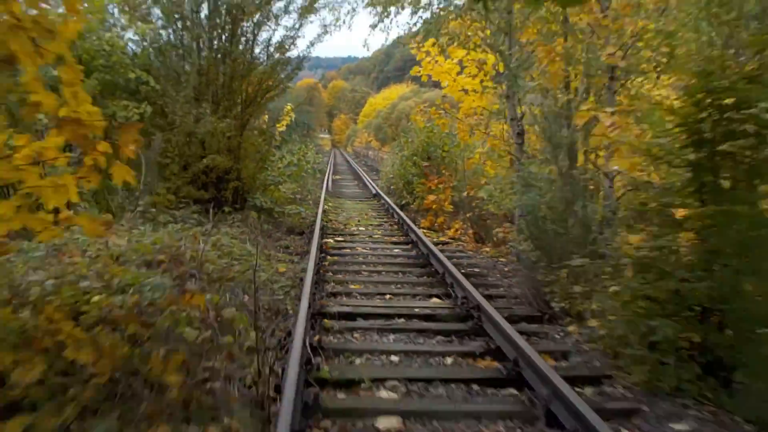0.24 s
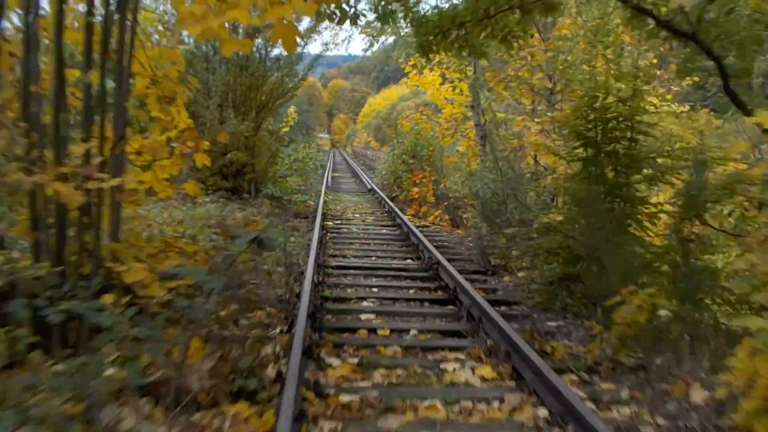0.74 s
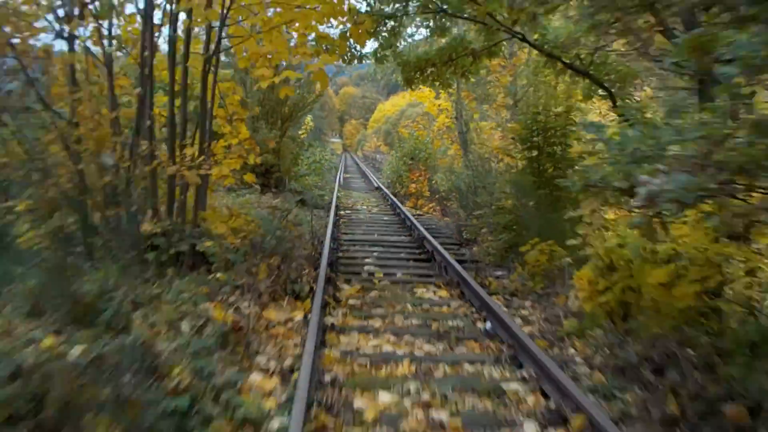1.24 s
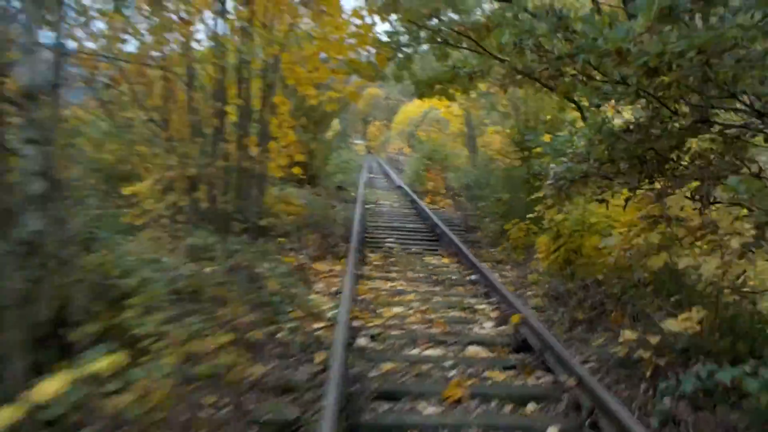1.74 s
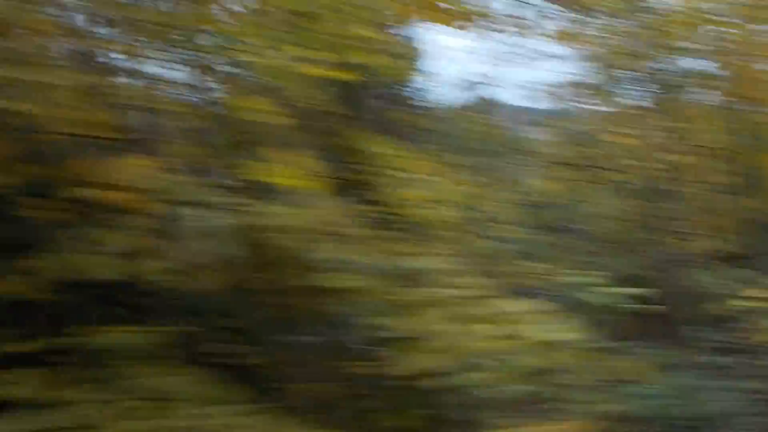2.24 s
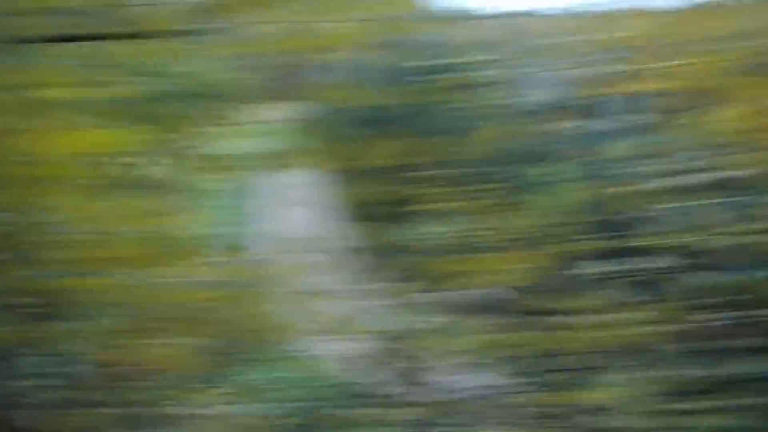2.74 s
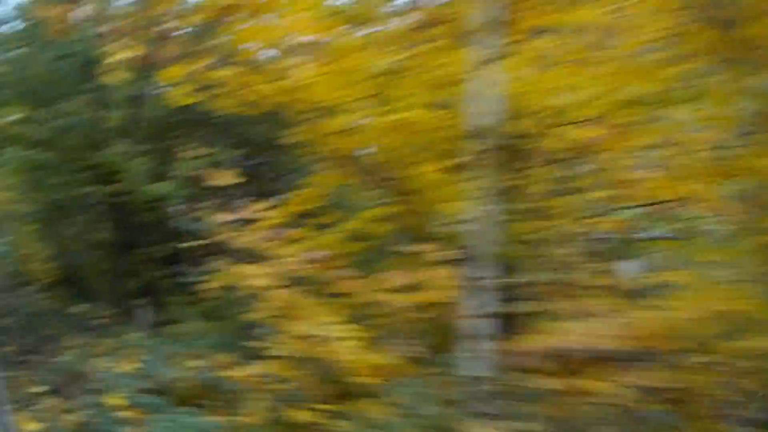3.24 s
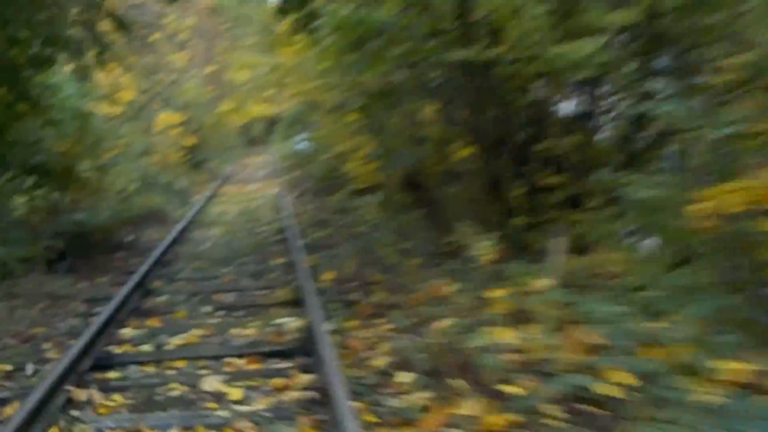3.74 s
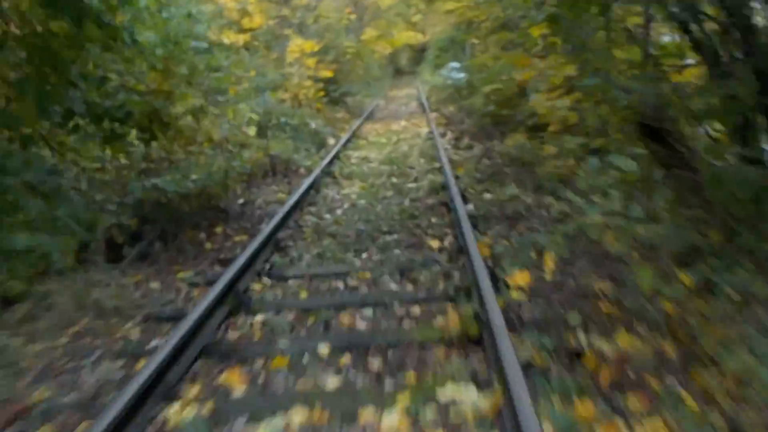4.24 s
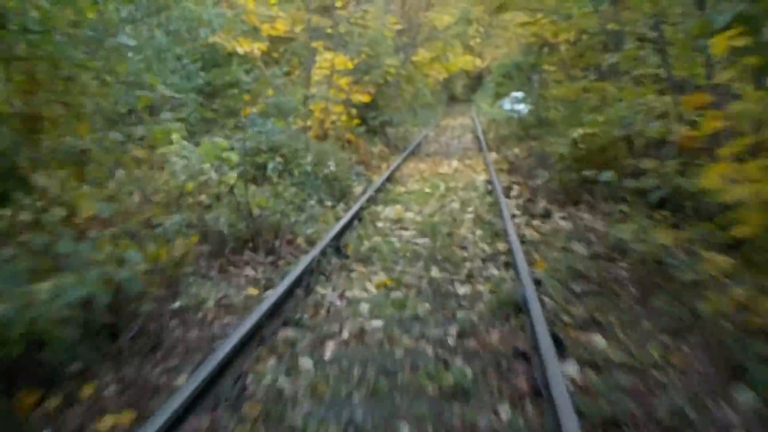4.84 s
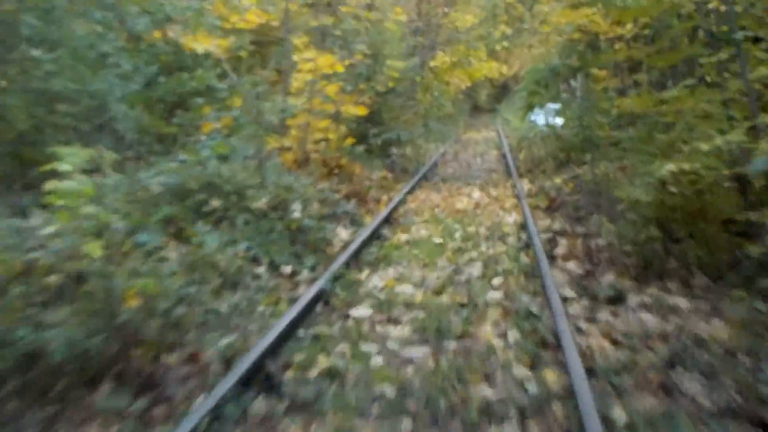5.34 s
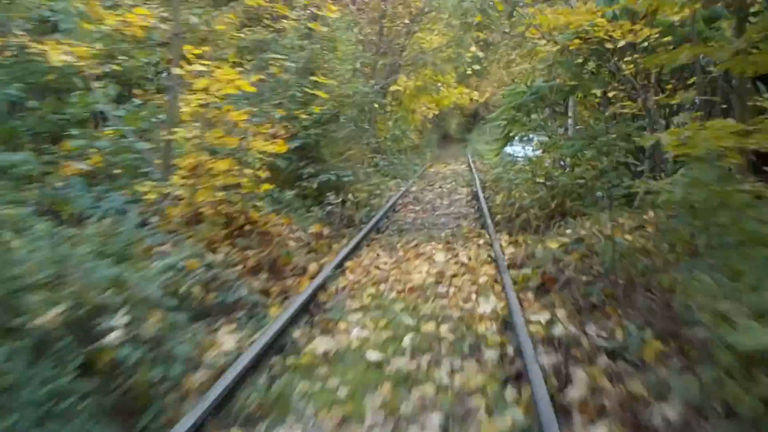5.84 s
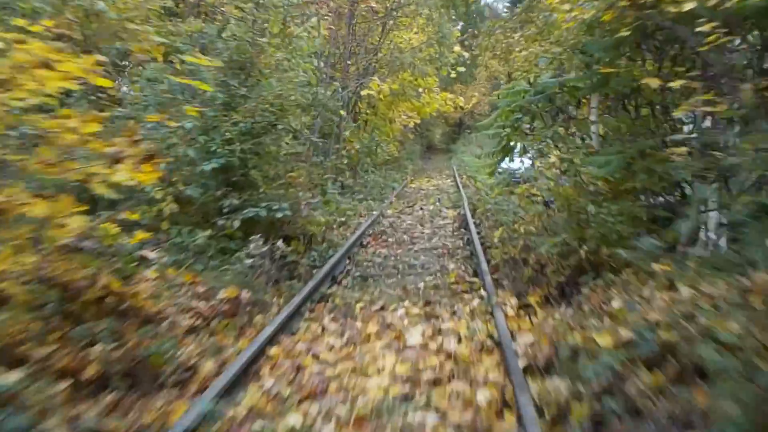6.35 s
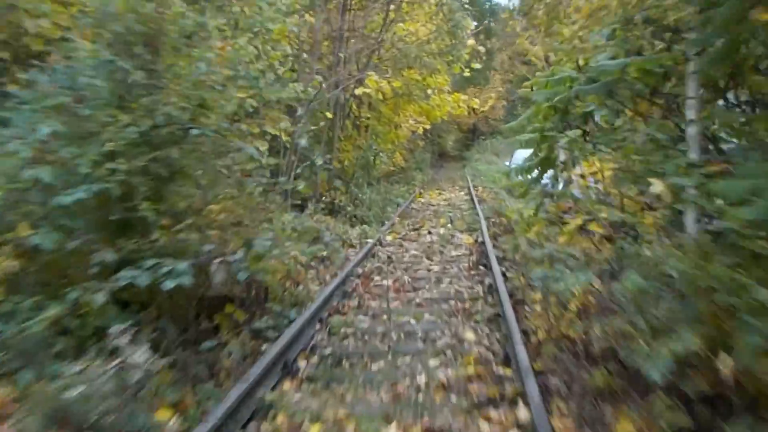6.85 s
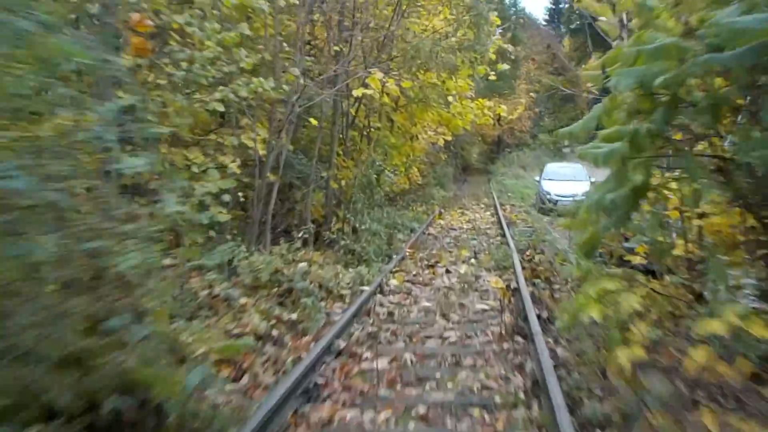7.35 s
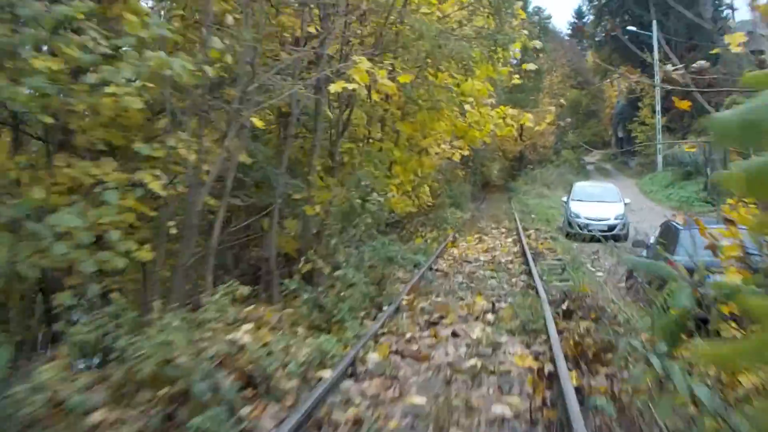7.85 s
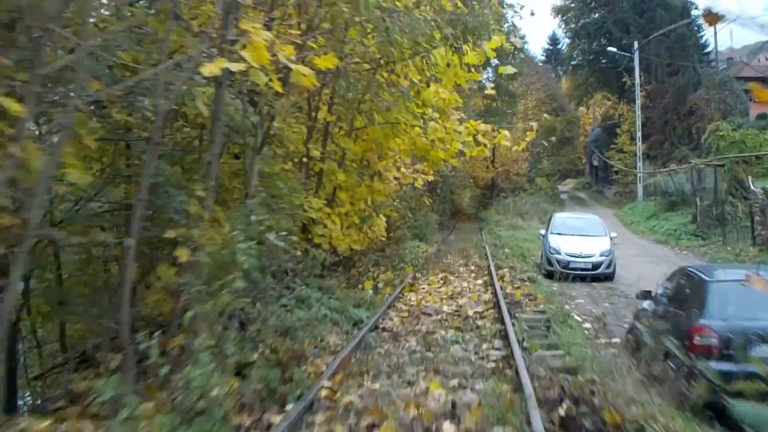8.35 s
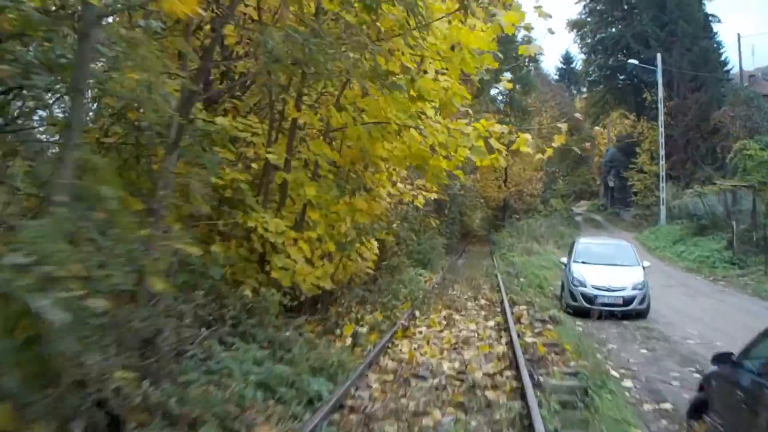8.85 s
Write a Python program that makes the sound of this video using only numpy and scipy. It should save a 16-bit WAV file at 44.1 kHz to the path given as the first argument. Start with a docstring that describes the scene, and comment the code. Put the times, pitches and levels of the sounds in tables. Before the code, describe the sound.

A light rail trolley roars and clanks along rusty overgrown track, leaves hissing and twigs snapping, while wind buffets the on-board microphone.

```python
"""Steel wheels roar on rusty rails, with a beat that repeats each turn, and leaves hiss on the rail heads.
The microphone rides on board a light rail trolley along an overgrown track: bumps clank the frame
and twigs snap. The airstream buffets the two ports, and shifts between them as the microphone swings.
Shaped noise makes the roar, hiss and wind; struck or driven resonances make the clanks, snaps and pops."""
import sys
import numpy as np
from scipy import signal
from scipy.fft import rfft, irfft, next_fast_len
from scipy.io import wavfile
from scipy.ndimage import uniform_filter1d

SR = 44100
rng = np.random.default_rng(int(sys.argv[2]) if len(sys.argv) > 2 else 0)


def materialize(psi):
    """Save the field psi as 16-bit PCM at rate SR to the path in sys.argv[1].

    A 1-D psi becomes a single channel; in a 2-D psi each row is a channel.
    """
    bounded = np.clip(np.atleast_2d(psi).T, -1, 1)
    quanta = np.round(bounded * 32767).astype(np.int16)
    wavfile.write(sys.argv[1], SR, quanta)


N = 400869
TIME = np.arange(N) / SR

# Twigs that snap or whip the frame. Each row: start in seconds, level in dB before the mix trims,
# decay of the scrape in seconds.
TWIG_HITS = [(0.076, -22.5, 0.019), (0.17, -24.5, 0.025), (0.3598, -26, 0.015), (0.688, -27, 0.017),
             (0.7866, -27.5, 0.026), (1.116, -29, 0.0088), (1.263, -25, 0.0055), (1.3442, -21, 0.016),
             (1.951, -28, .01), (2.347, -24, 0.023), (2.393, -29, 0.0066), (2.435, -25, 0.01),
             (2.466, -30, .004), (2.521, -30, .006), (2.555, -33, 0.0045), (4.001, -30, .008),
             (4.127, -23, .003), (4.264, -30, 0.0037), (4.3245, -28.5, 0.022), (5.704, -26.5, 0.032),
             (6.7382, -16, .013), (6.764, -17.5, 0.017), (6.776, -26, .016), (6.968, -27, .008),
             (7.388, -34, 0.011), (7.5854, -26.5, 0.012), (7.706, -30, 0.015), (8.05, -31, 0.011)]
# Spectrum of the wheels' roar. Each row: frequency in Hz, relative density in dB per Hz.
ROLL_SPECTRUM = [(35, -92.5), (60, -64), (76, -52.5), (145, -51.5), (191, -17.5), (244, -9), (401, -2),
                 (475, -6.5), (677, -2.5), (754, -2), (1060, -7), (1420, -13.5), (1660, -16), (1960, -18.5),
                 (2400, -45.5), (3120, -64.5), (5280, -120)]


def amp(db):
    """Turns decibels into a factor."""
    return 10 ** (np.asarray(db) / 20)


def unit(x):
    """Scales to rms 1."""
    return x / np.sqrt(np.mean(x ** 2) + 1e-20)


def curves(rows):
    """Each column of a table over time, joined by straight lines."""
    s, *columns = np.transpose(rows)
    return [np.interp(TIME, s, c) for c in columns]


def read(points, hz):
    """A spectrum on a log-frequency axis."""
    f, value = np.transpose(points)
    return np.interp(np.log(hz + 1), np.log(f + 1), value)


def add(mix, s, sound):
    """Mixes a sound in at time s."""
    part = mix[..., max(round(s * SR), 0):][..., :sound.shape[-1]]
    part += sound[..., :part.shape[-1]]


def held(start_s, end_s, attack_s, release_s):
    """An envelope 0-1 that rises, holds and falls."""
    rise, fall = (TIME - start_s) / attack_s, (end_s - TIME) / release_s
    return np.clip(np.minimum(rise, fall), 0, 1)


def lowpass(x, hz, order):
    """Removes the treble above hz."""
    return signal.sosfilt(signal.butter(order, min(hz, SR / 2 - 1), fs=SR, output="sos"), x)


def highpass(x, hz, order):
    """Removes the bass below hz."""
    return signal.sosfilt(signal.butter(order, min(hz, SR / 2 - 1), "high", fs=SR, output="sos"), x)


def wobble(low_hz, high_hz):
    """Slow chance, mainly between two rates, rms 1."""
    size = next_fast_len(N)
    hz = np.fft.rfftfreq(size, 1 / SR)
    band = hz / (hz + low_hz) / (1 + (hz / high_hz) ** 2)
    return unit(irfft(rfft(rng.standard_normal(size)) * band, size)[:N])


def noise(spectrum, same, patchy_db, tilt_db=None, pivot_hz=600):
    """Two-channel noise with drifting patches in time and pitch, and an optional moving tilt."""
    frames, hz = N // 256 + 5, np.fft.rfftfreq(1024, 1 / SR)
    a, b, c, d, patches = rng.standard_normal((5, frames, len(hz)))
    patches = uniform_filter1d(patches, size=7, axis=0)
    patches = unit(uniform_filter1d(patches, size=6, axis=1))
    field_db = read(spectrum, hz) + patchy_db * patches
    if tilt_db is not None:
        tilt = tilt_db[np.linspace(0, N - 1, frames).astype(int), None]
        field_db = field_db + tilt * np.clip(np.log2((hz + 1) / pivot_hz), -1, 1.1)
        # even out the power, so that the tilt changes the colour rather than the level
        power = uniform_filter1d((amp(field_db) ** 2).sum(1), size=30)
        field_db = field_db - 10 * np.log10(power)[:, None]
    like = np.clip(read(same, hz), -1, 1)  # left-right likeness
    left, other = a + 1j * b, c + 1j * d
    right = like * left + np.sqrt(1 - like ** 2) * other
    z = np.array([left, right]) * amp(field_db)
    return unit(signal.istft(z.transpose(0, 2, 1), nperseg=1024, noverlap=768)[1][:, :N])


def wheel_beat():
    """Lift in dB as each rough spot of the treads comes round to the rail."""
    # Rough spots. Each row: place in the turn 0-1, length in turns, lift in dB before scaling.
    tread_spots = [(.34, .05, 7), (.65, .045, 4), (.91, .05, 3.8), (.18, .03, 2.5)]
    # Strength of the beat. Each row: time in seconds, factor on the lift.
    beat_strength = [(0, 0.41), (1.9, 0.4), (3, 0.2), (5.5, 0.21), (7, 0.76), (9.09, 0.15)]
    turns = 5.28 * TIME  # turns per second
    lift_db = np.zeros(N)
    for at, length, db in tread_spots:
        from_spot = (turns - at + .5) % 1 - .5
        lift_db += db * np.exp(-.5 * (from_spot / length) ** 2)
    return (lift_db - lift_db.mean()) * curves(beat_strength)[0] * (1 + 0.14 * wobble(0.88, 24))


def rolling(level_db, beat_db):
    """Rust and grit under the wheels shake rails and frame."""
    # Each row: frequency in Hz, left-right likeness 0-1.
    roll_likeness = [(100, 0.32), (700, 1), (2400, 0.93)]
    grit_db = 1.43 * wobble(6.8, 42)
    roar = noise(ROLL_SPECTRUM, roll_likeness, patchy_db=1.7)
    return roar * amp(level_db + beat_db + grit_db - 4.5)


def resonate(x, hz, width):
    """A resonance that follows the curve hz: shifted down to 0 Hz, smoothed twice, shifted back."""
    turn, r = np.exp(2j * np.pi * np.cumsum(hz) / SR), np.exp(-np.pi * width / SR)
    return (turn * signal.lfilter([(1 - r) ** 2], [1, -2 * r, r * r], x / turn)).real


def rumble(level_db):
    """Wheels and rails ring in lumps; each resonance wanders and swells as the contact point moves."""
    # Each row: centre in Hz, half the filter's width setting in Hz, level in dB relative to the others.
    rail_modes = [(433.5, 51.5, -15.5), (589, 48, -16.5), (800, 53, -10.5), (1116, 66, -20.5),
                  (1628, 60, -19.5)]
    wander, swell_depth_db = 0.06, 3.5  # share of the pitch; dB per unit of chance
    out = np.zeros(N)
    for hz, width, db in rail_modes:
        path_hz = hz * (1 + wander * wobble(0.25, 6.1))
        ring = resonate(rng.standard_normal(N), path_hz, 2 * width)
        swell_db = swell_depth_db * np.minimum(wobble(2.4, 9), 1.5)
        out += amp(db) * unit(ring * amp(swell_db))
    return lowpass(highpass(out, hz=300, order=5), hz=1940, order=10) * amp(level_db)


def chatter(level_db, count=900, spread_db=4, ring_s=0.017, lift_db=-10):
    """Many loose parts of the frame tap at random, each at its own pitch."""
    t, out = TIME[:SR // 16], np.zeros(N)
    for when, pitch, size in rng.random((count, 3)):
        hz = 330 * (1850 / 330) ** pitch  # 330-1850 Hz, even in octaves
        db = 0.78 * read(ROLL_SPECTRUM, hz) + spread_db * min(-np.log(1 - size), 2.5)
        add(out, when * N / SR, amp(db) * np.sin(2 * np.pi * hz * t) * np.exp(-t / ring_s))
    out = highpass(out, hz=290, order=6)
    return unit(lowpass(out, hz=2030, order=10)) * amp(level_db + lift_db)


def hiss(level_db, beat_db):
    """Leaves are crushed on the rail heads in uneven bursts, and swish after each twig."""
    # Each row: frequency in Hz, relative density in dB per Hz.
    leaf_spectrum = [(1800, -28.5), (2400, -22), (2700, 4), (3040, -11), (3300, -2), (3870, 0),
                     (4420, -6.5), (5490, 3.5), (6050, -0.5), (6600, 2), (7000, -3), (7600, -24),
                     (8200, -58), (10000, -47)]
    # Each row: frequency in Hz, left-right likeness 0-1.
    leaf_likeness = [(2500, 0.85), (4000, .6), (7000, 0.25)]
    swish_db, swish_rise_s = -9.5, 0.0059  # level relative to the twig's table level
    crush_db = 1.4 * wobble(0.59, 54)
    t, swish = TIME[:SR // 3], np.zeros(N)
    for s, db, scrape_s in TWIG_HITS:
        add(swish, s, amp(db + swish_db) * (1 - np.exp(-t / swish_rise_s)) * np.exp(-t / scrape_s))
    crushed = amp(level_db + 0.54 * beat_db + 1.82)
    leaves = noise(leaf_spectrum, leaf_likeness, patchy_db=2.0)
    return leaves * np.hypot(crushed, swish) * amp(crush_db)


def wind(left_db, right_db, bright_db):
    """Each port has its own eddies; larger gusts reach both."""
    # Each row: frequency in Hz, relative density in dB per Hz before the tilt.
    wind_spectrum = [(18, -74), (30, -93), (178, -26.5), (384, 0.5), (574, 2), (814, 0), (1330, -11),
                     (1660, -18.5), (1960, -27), (2190, -32), (2400, -63), (3120, -78), (5280, -120)]
    own_db = 1.66 * np.array([wobble(4.4, 45), wobble(9.9, 50)])
    eddies_db = own_db + 1.0 * wobble(6.3, 30)
    air = noise(wind_spectrum, [(30, 0.0094), (2400, 0.023)], patchy_db=1.0, tilt_db=bright_db)
    return air * amp(np.array([left_db, right_db]) + eddies_db + 0.53)


def wind_fizz(left_db, right_db, bright_db):
    """Air that strikes a port head-on also fizzes: treble noise that grows with the brightness."""
    fizz_spectrum = [(1500, -14), (2300, -10.5), (2750, 4), (3500, 1.5),
                     (5000, -8.5), (7000, -15.5), (8000, -37.5)]
    fizz = noise(fizz_spectrum, [(2000, 0.0014), (7000, 0.004)], patchy_db=1.0)
    return fizz * amp(np.array([left_db, right_db]) + 1.23 * bright_db - 45)


def wind_pops(left_db, right_db, bright_db):
    """Small eddies burst on each port as sharp pops, loudest when the air strikes head-on."""
    # Resonances of a port. Each row: frequency in Hz, width in Hz, level in dB.
    port_modes = [(900, 550, -1.5), (1400, 800, -1)]
    pops_per_s, pop_db, pop_per_bright = 160, -14.5, 0.62  # level re wind; dB per dB of brightness
    t = TIME[:SR // 100]
    pop = sum(amp(db) * np.exp(-np.pi * w * t) * np.sin(2 * np.pi * f * t) for f, w, db in port_modes)
    bursts = rng.standard_normal((2, N)) * (rng.random((2, N)) < pops_per_s / SR)
    pops = signal.oaconvolve(bursts, pop[None])[:, :N]
    pops = lowpass(highpass(pops, hz=350, order=3), hz=1950, order=12)
    return unit(pops) * amp(np.array([left_db, right_db]) + pop_db + pop_per_bright * bright_db)


def flutter():
    """Slow eddies thump softly, mainly on the left port."""
    # Each row: time in seconds, level at the left port in dB.
    flutter_level = [(0, -68), (1.8, -58), (2.1, -42.5), (2.6, -57), (3.2, -40), (3.9, -41.5), (4.4, -44),
                     (7.2, -44.5), (7.7, -49.5), (9.09, -51)]
    low_spectrum = [(20, -30.0), (45, -12), (75, -11.0), (120, -3), (190, 5.5), (300, -26.5), (600, -66.0)]
    air = noise(low_spectrum, [(20, 0.0096), (600, 0.0033)], patchy_db=1.5)
    return air * amp(curves(flutter_level)[0] + np.array([[0], [-11]]))


def ticks():
    """Faint, thin ticks, louder and softer in slow waves, over a trace of fizz in the top treble."""
    size = amp(6.5 * np.minimum(rng.exponential(1, N), 2.2))
    strikes = rng.random(N) < 130 / SR  # 130 a second on average
    waves = amp(4 * np.clip(wobble(2, 18), -2, 1))
    shared = size * strikes * waves
    sparks = shared * rng.uniform(-.3, 1, (2, N)) + .026 * rng.standard_normal((2, N))
    return amp(-63.5) * unit(highpass(sparks, hz=9000, order=7))


def judder(modes, length_s):
    """A wheel grinds over a rough spot, shaking a set of modes until it lets go."""
    t, length_s = TIME[:SR // 12], max(length_s, .004)
    grip = np.clip(np.minimum(t, length_s - t) / 0.0027, 0, 1)  # the force rises and falls in 2.7 ms
    sound = np.zeros(len(t))
    for f, w, db in modes:
        force = grip * rng.standard_normal(len(t))
        ring = np.exp(-np.pi * w * t) * np.sin(2 * np.pi * f * t)
        sound += amp(db) * unit(signal.fftconvolve(force, ring)[:len(t)])
    return unit(sound) * np.sqrt(length_s / t[-1])  # energy of rms 1 over the contact


def note(hz, length_s):
    """The frame's note builds up while a bump lasts, drifts a little and dies away."""
    drift_share, decay_s = .04, .008
    t = TIME[:SR // 8]
    drift, phase = rng.uniform(-0.95, 1, 2)
    turns = np.cumsum(hz * (1 + drift_share * drift * np.tanh(t / length_s - .5))) / SR
    swell = (1 - np.exp(-4 * t / length_s)) * np.exp(-np.maximum(t - 0.76 * length_s, 0) / decay_s)
    return np.sqrt(2) * swell * np.sin(2 * np.pi * turns + np.pi * phase)


def knocks():
    """Bumps thump the frame at their own pitch, favour the modes near it, and rattle its loose steel."""
    # Bumps in the track. Each row: start in seconds, length in seconds, level in dB before the parts'
    # trims, pitch of the thump in Hz, rattle of loose steel in dB relative to the level.
    bumps = [(0.068, 0.028, -21.5, 727, -6), (0.123, 0.017, -21.5, 726, -4),
             (0.188, 0.017, -17.5, 528, -10), (0.224, 0.02, -20, 496, -18), (0.246, 0.018, -12.5, 603, -22),
             (0.357, 0.028, -18, 794, -14), (0.415, 0.01, -17, 686, -7), (0.438, 0.024, -17, 665, -12),
             (0.603, 0.014, -14, 738, -13), (0.624, 0.015, -13, 500, -25), (0.682, 0.019, -22, 1726, -4),
             (0.777, 0.023, -24, 790, -3), (0.815, 0.017, -14, 760, -15), (0.87, 0.018, -18, 694, -10.5),
             (1, 0.017, -12.5, 766, -21), (1.129, 0.015, -18.5, 800, -6), (1.199, 0.02, -18, 742, -8),
             (1.222, 0.019, -18, 757, -15), (1.249, 0.027, -21.5, 445, -22), (1.3, 0.023, -13.5, 799, -19),
             (1.352, 0.021, -15, 469, -19), (1.382, 0.015, -15, 474, -24), (1.449, 0.031, -18, 660, -8),
             (1.488, 0.013, -14, 754, -17), (1.571, 0.024, -14.5, 731, -15), (1.678, 0.012, -26, 770, -12),
             (1.734, 0.015, -17.5, 955, -13), (1.759, 0.017, -18.5, 658, -22),
             (1.8, 0.025, -18.5, 468, -16), (1.871, 0.027, -13.5, 760, -19.5),
             (1.951, 0.017, -15.5, 792, -13), (2.012, 0.015, -16, 684, -13), (2.07, 0.009, -14, 770, -27),
             (2.117, 0.027, -22, 1112, -12), (2.246, 0.017, -14.5, 797, -21), (2.283, 0.024, -13, 824, -15),
             (2.336, 0.022, -17, 810, -13), (2.43, 0.024, -13, 811, -14), (2.502, 0.024, -21, 416, -17),
             (2.587, 0.02, -19, 1174, -10), (2.899, 0.018, -20, 707, -15), (3.534, 0.025, -22, 856, -16),
             (4.014, 0.026, -17.5, 704, -16), (4.123, 0.013, -15.5, 646, -9.5),
             (4.18, 0.02, -19.5, 445, -21), (4.295, 0.016, -16, 900, -13), (4.322, 0.012, -19.5, 720, -4.5),
             (4.414, 0.019, -13, 736, -28), (4.465, 0.021, -16.5, 637, -29),
             (4.596, 0.024, -15.5, 710, -18), (4.789, 0.017, -14.5, 643, -13),
             (4.851, 0.02, -17.5, 574, -24), (4.928, 0.022, -21, 1160, -7.5), (4.993, 0.013, -20, 820, -25),
             (5.108, 0.022, -15.5, 558, -27), (5.356, 0.018, -15.5, 771, -18),
             (5.462, 0.011, -21, 704, -18), (5.527, 0.018, -22, 592, -15), (5.637, 0.022, -16, 760, -17),
             (5.832, 0.019, -25.5, 1324, -8), (5.897, 0.016, -19.5, 495, -26), (5.92, 0.016, -16, 686, -16),
             (5.968, 0.015, -15.5, 692, -23), (6.026, 0.013, -16, 409, -29),
             (6.056, 0.021, -17.5, 477, -27), (6.273, 0.018, -18, 416, -25), (6.296, 0.023, -22, 667, -25),
             (6.349, 0.016, -16.5, 638, -17), (6.487, 0.014, -20, 410, -14),
             (6.674, 0.014, -13.5, 710, -14), (6.734, 0.0094, -15.5, 567, -13),
             (6.764, 0.0053, -10.5, 1194, -8), (6.839, 0.021, -18, 726, -19), (6.92, 0.022, -14, 710, -25),
             (7.038, 0.016, -16.5, 698, -19), (7.108, 0.015, -15.5, 700, -17), (7.25, 0.012, -18, 690, -18),
             (7.289, 0.019, -20, 598, -25), (7.429, 0.022, -20.5, 510, -13), (7.579, 0.015, -18, 750, -15),
             (7.677, 0.021, -19.5, 775, -25), (7.794, 0.024, -23, 427, -23),
             (8.139, 0.021, -18.5, 574, -22), (8.211, 0.016, -18, 507, -30),
             (8.799, 0.019, -19.5, 680, -21), (8.975, 0.061, -20, 640, -21)]
    # Modes of the frame, then of the loose steel. Each row: frequency in Hz, width in Hz, level in dB
    # (the frame's before the focus on the thump).
    frame_modes = [(354, 250, -3), (536, 150, 1.5), (760, 120, -1.5), (936, 97, 1), (1090, 510, -2.5)]
    steel_modes = [(1170, 130, -2.5), (1654, 31, -0.5), (1600, 38, -1), (1980, 280, -1)]
    focus_db = 11.5  # loss of a mode one octave from the thump's pitch
    judder_db, ring_db = -3, -2.5
    out = np.zeros(N)
    for s, length_s, db, centre_hz, rattle_db in bumps:
        frame = [(f, w, mode_db - focus_db * np.log2(f / centre_hz) ** 2) for f, w, mode_db in frame_modes]
        thump = amp(judder_db) * judder(frame, length_s)
        rattle = amp(rattle_db) * judder(steel_modes, length_s)
        add(out, s, amp(db) * (thump + rattle))
        add(out, s, amp(db + ring_db) * note(centre_hz, length_s))
    return lowpass(highpass(out, hz=288, order=4), hz=2000, order=10)


def strike(modes, contact_s, blow=.4):
    """A first blow and a chattering contact that dies away ring a set of modes; peak 1."""
    t = TIME[:SR // 6]
    force = rng.standard_normal(len(t)) * np.exp(-t / max(contact_s, 1 / SR))
    force = force / np.linalg.norm(force) + blow * (t == 0)
    ring = sum(amp(db) * w * np.exp(-np.pi * w * t) * np.cos(2 * np.pi * f * t) for f, w, db in modes)
    sound = signal.fftconvolve(force, ring)[:len(t)]
    return sound / abs(sound).max()


def twigs():
    """A sharp snap with a scrape that differs at each port; no two twigs ring quite alike."""
    # Each row: frequency in Hz before the spread, width in Hz, level in dB.
    twig_modes = [(1930, 64, 10.5), (3800, 220, -11.5), (4070, 130, -0.5), (5470, 920, 4), (6600, 210, 7.5)]
    pitch_spread = 0.023  # share by which the modes differ in pitch from twig to twig
    out = np.zeros((2, N))
    for s, db, scrape_s in TWIG_HITS:
        modes = [(f * (1 + pitch_spread * rng.standard_normal()), w, mode_db) for f, w, mode_db in twig_modes]
        snap = strike(modes, contact_s=.003, blow=.7)
        scrape = np.array([strike(modes, contact_s=scrape_s, blow=0.07) for port in out])
        add(out, s, (snap + 0.66 * scrape) * amp(db + 5.0))
    return lowpass(out, hz=6610, order=14)


def all_dips(count=10):
    """Rows of the set dips, then of shallow ones that come at random in the wind."""
    # The level dips briefly. Each row: time in seconds, depth setting in dB (about 72 % is reached).
    set_dips = [(0.286, 3.5), (0.639, 7.5), (0.832, 2.5), (2.406, 6), (2.913, 13), (3.155, 10.5), (3.38, 6),
                (3.467, 16), (3.588, 12), (3.759, 21), (4.069, 6), (4.13, 6), (6.372, 4.5), (6.98, 3.5),
                (4.736, 9), (6.123, 10), (6.747, 7), (6.772, 7), (7.059, 4), (7.169, 9), (7.343, 6.5),
                (7.945, 5)]
    shallow_db, windy_from_s = 4.5, 1.9  # the same depth setting; start of the random dips
    places = (np.arange(count) + rng.random(count)) / count
    times = windy_from_s + (N / SR - windy_from_s) * places
    return set_dips + [(s, shallow_db) for s in times]


def gusts(rows):
    """Lift in dB of the wind as it builds up to each dip."""
    gust_db, rise_s = 2.5, 0.019
    t, lift_db = TIME[:SR // 8], np.zeros(N)
    for s, depth_db in rows:
        add(lift_db, s - t[-1], gust_db * np.exp((t - t[-1]) / rise_s))
    return lift_db


def dips(rows):
    """A gain that drops within milliseconds and swells back."""
    fall_s, recover_s = 0.0021, 0.022
    t, down_db = TIME[:SR // 3], np.zeros(N)
    for s, depth_db in rows:
        add(down_db, s, depth_db * np.exp(-t / recover_s) * (1 - np.exp(-t / fall_s)))
    return amp(-0.51 - down_db)


def dry_ticks():
    """Dry ticks, very short, with no ring, many of them as the level dips."""
    # Each row: time in seconds, level in dB before the trim and filters.
    tick_rows = [(2.911, -34), (3.154, -30), (3.221, -32), (3.312, -28), (3.374, -30), (3.425, -28),
                 (3.448, -34), (3.467, -26), (3.562, -27), (3.587, -32), (3.759, -26), (3.815, -34),
                 (3.853, -29), (3.873, -33), (4.735, -23), (6.122, -39), (6.946, -29), (7.169, -36)]
    out = np.zeros((2, N))
    for s, db in tick_rows:
        tick = unit(rng.standard_normal((2, 64)) * np.hanning(64))
        add(out, s - .001, tick * amp(db - 1))
    return lowpass(highpass(out, hz=3020, order=3), hz=6800, order=14)


def brush():
    """Leaves of a branch rattle against the frame, harder as it bends, until it slips off."""
    # Each row: frequency in Hz, relative density in dB per Hz.
    branch_spectrum = [(2400, -26), (2750, -5), (3100, -7), (3800, 1), (4500, -6), (5500, 3), (6500, 1),
                       (7000, -3), (7600, -28), (8200, -60)]
    start_s, end_s, edge_s = 6.76, 7.06, .003
    end_db, rise_db_per_s = -40, 29
    contact = held(start_s, end_s, edge_s, edge_s)
    bend_db = rise_db_per_s * np.clip(TIME - end_s, -1, 0)
    leaves = noise(branch_spectrum, [(2500, .5), (7000, .2)], patchy_db=3.0)
    return leaves * contact * amp(end_db + bend_db + 1.9 * wobble(25, 164))


def scene():
    """Trolley, foliage and airstream at the two ports."""
    # Roughness of the track. Each row: time in seconds, rolling level in dB before the layers' trims.
    track_level = [(0, -17.5), (.9, -18.5), (1.35, -17.5), (2.1, -18), (2.35, -16), (2.65, -19), (3.1, -19),
                   (4.2, -18), (5.3, -20), (6.5, -18), (7.8, -22), (9.09, -19)]
    # Leaves on the rails. Each row: time in seconds, hiss level in dB before the trim.
    leaf_level = [(0, -40.5), (2.1, -42.5), (2.9, -45.5), (4.1, -42.5), (5.5, -44), (6.8, -45.5),
                  (8.2, -49.5), (9.09, -47.5)]
    # The airstream as the microphone swings round. Each row: time in seconds, left port in dB,
    # right port in dB (both before the layers' trims), brightness in dB per octave.
    airstream = [(0, -31.5, -45.5, -6), (1.87, -28.5, -43, -8), (2.08, -26, -24, 3.5), (2.38, -22, -25, -2),
                 (2.62, -19, -20.5, 6), (2.97, -18, -22, -3.5), (3.22, -22.5, -17.5, 8),
                 (3.45, -26.5, -17.5, 9.5), (3.69, -32, -14.5, 13), (3.8, -44, -13.5, 11),
                 (3.92, -35, -23, 5), (4.02, -18.5, -15.5, 2), (4.45, -21, -20, -1.5),
                 (4.7, -21, -18.5, -0.5), (5.2, -17, -15, 1.5), (6.2, -21.5, -18.5, 0),
                 (6.85, -19, -18.5, 0), (7.2, -30, -16, 0.5), (7.95, -24, -16.5, -1.5),
                 (8.55, -23.5, -15, 1.5), (9.09, -23, -17, 0.5)]
    # roar, ringing and hiss recede for a moment while the microphone points sideways
    lull = held(start_s=3.07, end_s=4.02, attack_s=0.1, release_s=0.14)
    roll_db = curves(track_level)[0] - 2.5 * lull
    ring_db = roll_db - 4 * lull  # the ringing parts recede further than the roar
    hiss_db = curves(leaf_level)[0] - 9 * lull
    beat_db, dip_rows = wheel_beat(), all_dips()
    trolley = rolling(roll_db, beat_db) + rumble(ring_db + .5 * beat_db)
    trolley = trolley + chatter(ring_db + beat_db) + knocks()
    foliage = hiss(hiss_db, beat_db) + twigs() + brush()
    ports = curves(airstream)
    air = wind(*ports) + wind_fizz(*ports) + wind_pops(*ports)
    air = air * amp(gusts(dip_rows)) + flutter()
    return (trolley + foliage + air) * dips(dip_rows) + ticks() + dry_ticks()


def limiter(x, ceiling_db, recover_db_per_s):
    """Turns both channels down at once on a peak, then lets them back up."""
    over_db = np.maximum(20 * np.log10(abs(x).max(0) + 1e-9) - ceiling_db, 0)
    fall = recover_db_per_s * TIME
    return x / amp(uniform_filter1d(np.maximum.accumulate(over_db + fall) - fall, size=24))


def record(dry):
    """Limiter, wind filter and band limit, with soft ends."""
    limited = limiter(dry, ceiling_db=-3.5, recover_db_per_s=150)
    thin = highpass(limited, hz=78, order=3) * signal.windows.tukey(N, .002)
    band_limit = signal.firwin(511, 15900, window=("kaiser", 9), fs=SR)  # treble edge in Hz
    return signal.oaconvolve(thin, band_limit[None], "same")


dry = scene()
out = record(dry)
materialize(out)
```